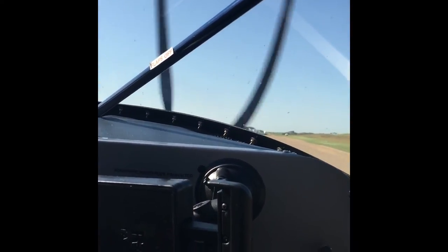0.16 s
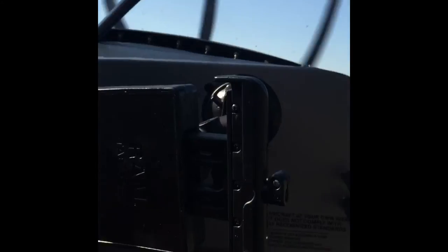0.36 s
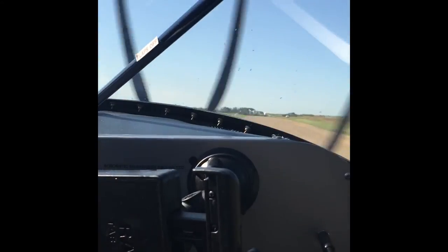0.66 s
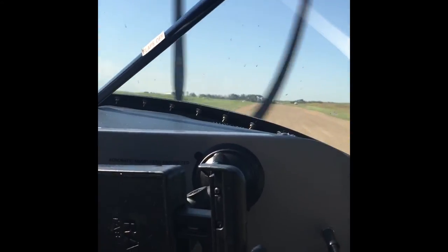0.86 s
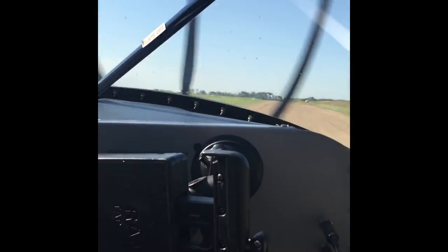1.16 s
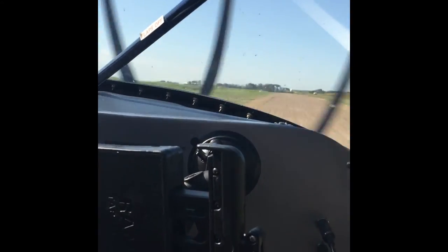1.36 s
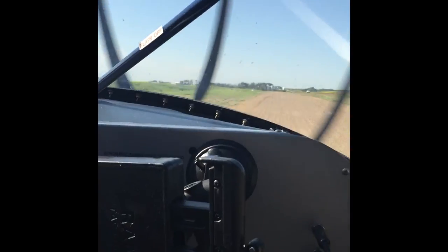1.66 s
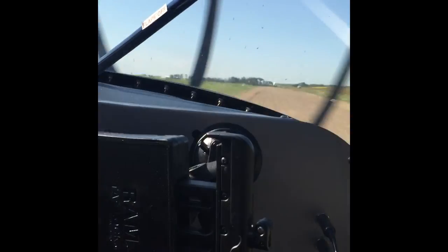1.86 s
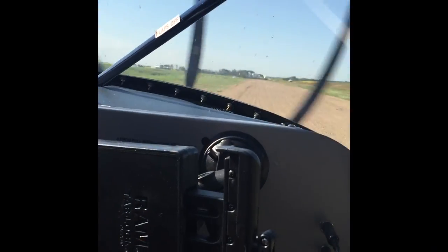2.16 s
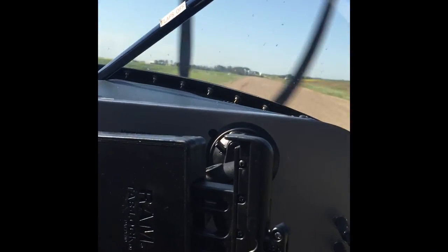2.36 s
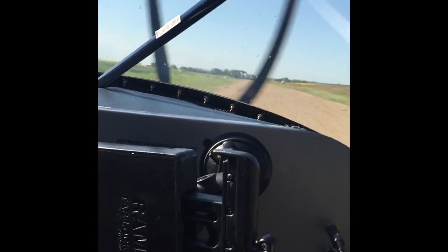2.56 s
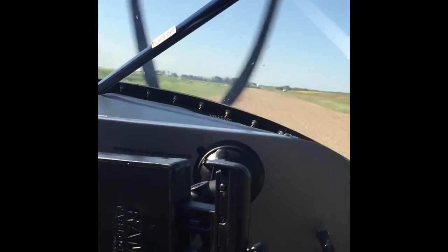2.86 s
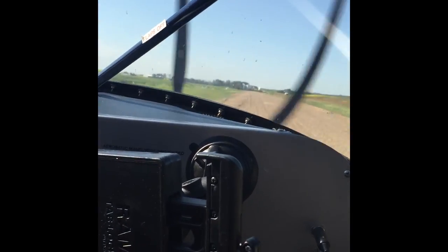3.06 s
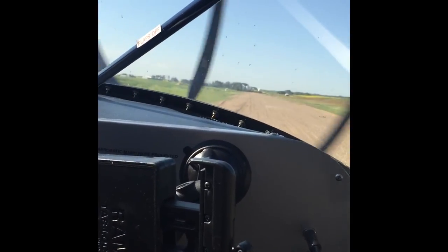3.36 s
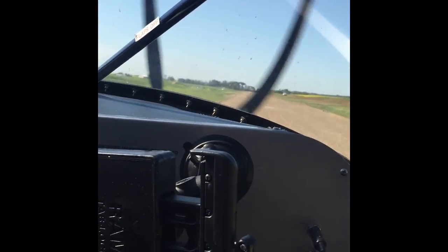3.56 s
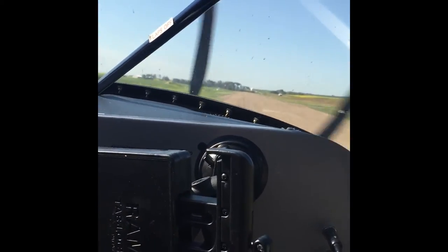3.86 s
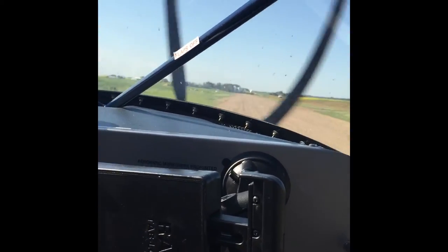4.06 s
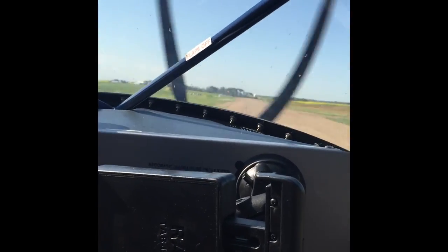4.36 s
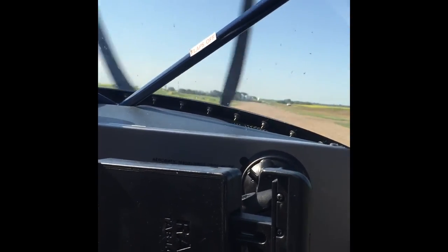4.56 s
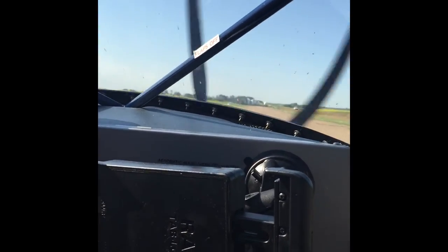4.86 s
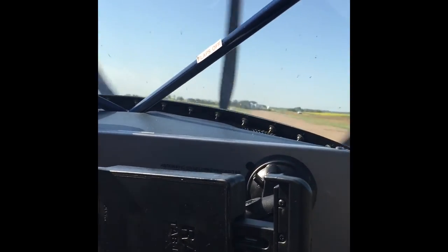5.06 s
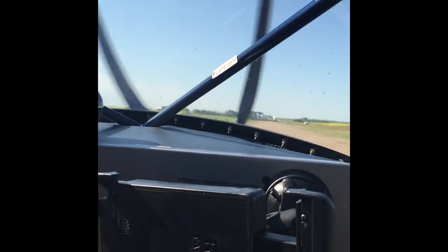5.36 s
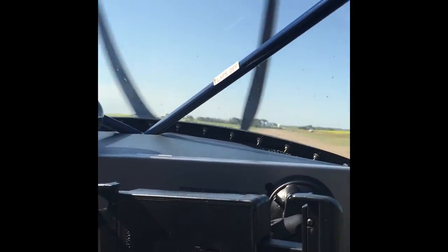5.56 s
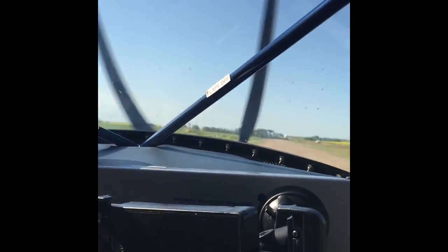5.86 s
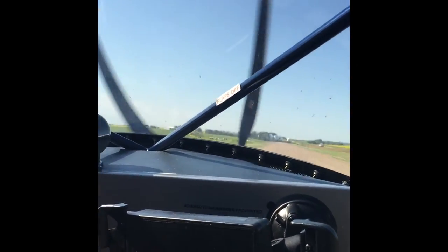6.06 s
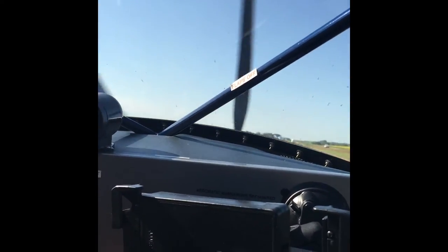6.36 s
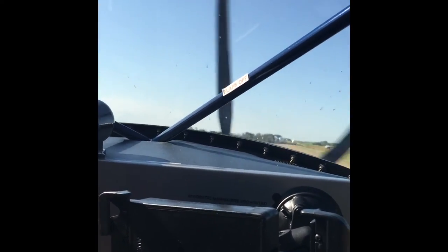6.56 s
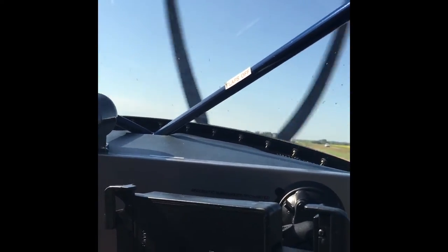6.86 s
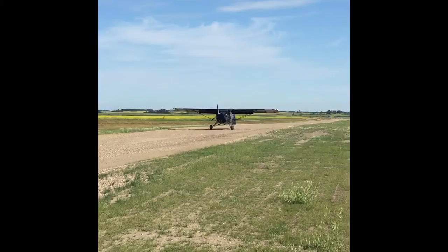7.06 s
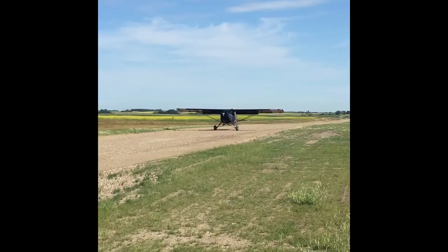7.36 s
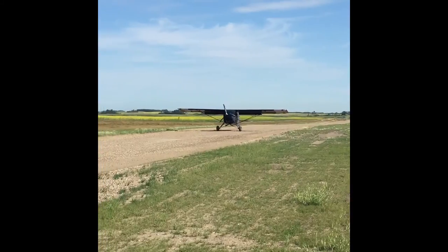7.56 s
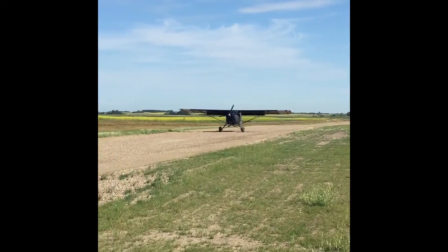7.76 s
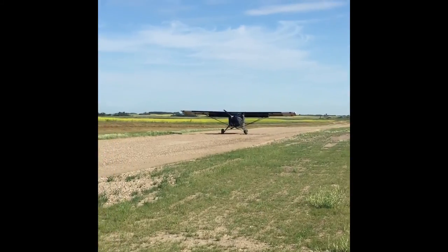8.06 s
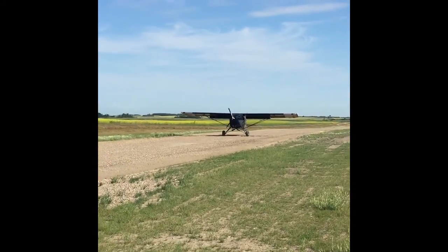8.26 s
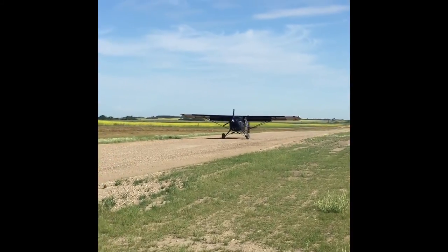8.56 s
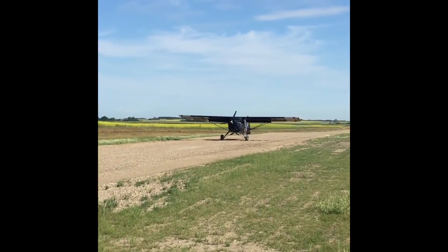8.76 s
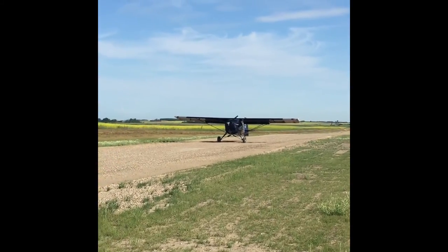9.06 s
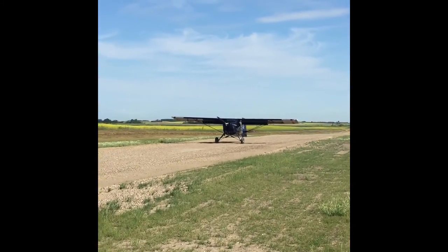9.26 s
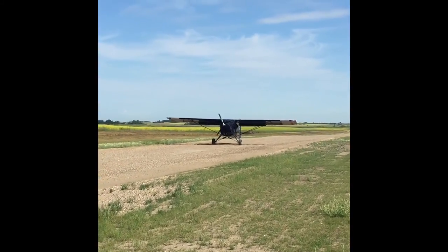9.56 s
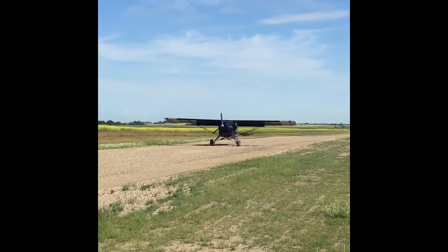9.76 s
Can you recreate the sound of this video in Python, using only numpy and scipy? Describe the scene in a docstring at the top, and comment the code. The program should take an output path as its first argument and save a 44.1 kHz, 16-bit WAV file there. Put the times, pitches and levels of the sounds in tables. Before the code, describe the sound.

A light aircraft's engine, heard from the seat, is throttled back and slides down to a low idle over wheel rumble, rushing air and small cabin rattles. Then the microphone is suddenly outdoors in an open field. The plane putters toward it from a distance, its propeller swish and thin gear whine growing. Soft wind puffs and a dull finger knock hit the microphone.

```python
"""Light aircraft taxiing on a dirt strip

In the cabin a four-cylinder engine is throttled back to idle: its orders slide through the cabin's
resonances, over rumbling wheels, propeller wash and ticking fittings. Then the scene jumps outside:
the plane idles closer, blades swishing and gears whining, with a breeze and one bump on the microphone."""
import sys
import numpy as np
from scipy import signal
from scipy.fft import rfft, irfft, next_fast_len
from scipy.io import wavfile

SR = 44100
rng = np.random.default_rng(int(sys.argv[2]) if len(sys.argv) > 2 else 0)


def unload_audio(sound):
    """Save the sound as a 16-bit wav file, at the path given as the first command line argument."""
    columns = np.transpose(np.atleast_2d(sound))
    # keep every value between -1 and 1, then stretch to whole-number steps
    steps = np.round(np.clip(columns, -1, 1) * 32767)
    wavfile.write(sys.argv[1], SR, steps.astype(np.int16))


N = 436590
TIME = np.arange(N) / SR
OUTSIDE_S, ARRIVED_S = 7.112, 9  # start and end of the approach
REDUCTION, BLADES = 2.43, 3  # crank turns per propeller turn, blade count

# Narrow whining bands and dips in the engine's noise. Each row: centre in Hz, half-width in Hz, lift in dB.
WHINE_BANDS = [(770, 35, 7), (1360, 44, 5), (1850, 60, 6), (2720, 100, 4), (3420, 70, 3), (4450, 110, -4.5),
               (4740, 45, 9.5), (5000, 80, -3.5), (6080, 60, 7), (6770, 60, 8)]


def amp(db):
    """Decibels to gain."""
    return 10 ** (np.asarray(db) / 20)


def unit(x):
    """Scale to rms 1."""
    return x / np.sqrt(np.mean(x ** 2) + 1e-20)


def curve(rows):
    """Rows of (time in s, value), interpolated per sample."""
    return np.interp(TIME, *np.transpose(rows))


def humps(rows):
    return sum(height * np.exp(-(2 * (TIME - s) / length_s) ** 2) for s, length_s, height in rows)


def level_at(spectrum, hz):
    """Rows of (Hz, dB), interpolated on a log-frequency axis."""
    points_hz, db = np.transpose(spectrum)
    return np.interp(np.log(hz + 1), np.log(points_hz + 1), db)


def noise(spectrum, bands=(), skirt_db_per_octave=30):
    """Noise of rms 1, shaped by a spectrum and narrow bands, rolled off past the spectrum's ends."""
    size = next_fast_len(N, True)
    hz = np.fft.rfftfreq(size, 1 / SR) + 1e-9
    octaves_out = abs(np.log2(hz / np.clip(hz, spectrum[0][0], spectrum[-1][0])))
    db = level_at(spectrum, hz) - skirt_db_per_octave * octaves_out
    db += sum(lift_db / (1 + ((hz - band_hz) / width_hz) ** 2) for band_hz, width_hz, lift_db in bands)
    return unit(irfft(rfft(rng.standard_normal(size)) * amp(db), size)[:N])


def drift(rate_hz):
    """Random wander of rms 1, mostly below rate_hz."""
    size = 4096
    hz = np.fft.rfftfreq(size, N / SR / size)
    slow = unit(irfft(rfft(rng.standard_normal(size)) / (1 + (hz / rate_hz) ** 2)))
    return np.interp(TIME, np.linspace(0, N / SR, size), slow)


def partial(turns, order=1):
    """Sinusoid at a multiple of a rotation; rms 1, random phase."""
    return np.sqrt(2) * np.cos(2 * np.pi * (order * turns + rng.random()))


def add(mix, start_s, sound):
    """Mix a sound in at start_s."""
    part = mix[round(start_s * SR):][:len(sound)]
    part += sound[:len(part)]


def throttle(ease_at_s=0.79, closing_s=0.56):
    """Throttle position: 1 open, 0 idle."""
    return np.clip(1 - (TIME - ease_at_s) / closing_s, 0, 1)


def approach(lost_db, steepness):
    """Level in dB as the plane nears: -lost_db when far, 0 on arrival."""
    far = np.clip((ARRIVED_S - TIME) / (ARRIVED_S - OUTSIDE_S), 0, 1)
    return -lost_db * far ** steepness


def swell(centre_s=8.68, length_s=0.44, edge_s=0.17, height_db=8):
    """Brief rise, hold and fall of the exhaust note, in dB."""
    return height_db * np.clip((length_s / 2 - abs(TIME - centre_s)) / edge_s + 0.5, 0, 1)


def propeller_angle(turns, top_s=8.169):
    """Propeller angle in radians, zero at the top of its stroke."""
    return 2 * np.pi * (turns - np.interp(top_s, TIME, turns)) / REDUCTION


def open_air(field_db=-54, breeze_db=-45, gust_db=3.5):
    """Steady outdoor background; a lumpy breeze and puffs of wind strike the microphone."""
    # Spectra. Each row: frequency in Hz, relative density in dB.
    field_spectrum = [(60, 0), (170, 13), (350, -3), (410, 9.5), (470, -3), (1300, -16), (1900, -40),
                      (3000, -20), (6000, -25), (15000, -34)]
    breeze_spectrum = [(15, -20), (32, -4), (48, 6), (75, 1), (120, 0), (250, -31), (600, -48)]
    # Wind puffs. Each row: start in seconds, level in dB, length in seconds.
    puffs = [(7.333, -41, 0.091), (7.567, -38, 0.068), (9.401, -31, 0.07), (9.503, -40, 0.072)]
    wind = noise(breeze_spectrum)
    out = amp(field_db) * noise(field_spectrum)
    out += amp(breeze_db) * unit(wind * amp(gust_db * drift(18)))
    for start_s, db, length_s in puffs:
        puff = wind[round(start_s * SR):][:round(length_s * SR)]
        add(out, start_s, amp(db) * unit(puff) * np.hanning(len(puff)))
    return out


def finger_bump(rub_db=-35):
    """A finger knocks the microphone's housing: a few cycles per knock, with a dull rub of skin."""
    # Knocks. Each row: start in seconds, level in dB, ring in Hz, length in seconds.
    knocks = [(8.152, -29, 430, 0.0071), (8.158, -15.5, 138, 0.027), (8.16, -28, 290, 0.016),
              (8.181, -34, 420, 0.018), (8.189, -24, 110, 0.0246)]
    out = np.zeros(N)
    rub = amp(rub_db) * noise([(100, 11), (480, -4), (750, -13), (1500, -33)])
    for start_s, db, hz, length_s in knocks:
        t = np.arange(0, length_s, 1 / SR)
        knock = amp(db) * np.sin(2 * np.pi * hz * t) + rub[round(start_s * SR):][:len(t)]
        add(out, start_s, knock * np.sin(np.pi * t / length_s))
    return out


def airframe(rumble_db=-25.5, clatter_db=-36, wash_db=-38, build_db_per_s=0.8134):
    """Wheels shake the frame and its panels; propeller wash beats on the windscreen."""
    # Rough ground. Each row: centre in seconds, length in seconds, extra shaking in dB.
    patches = [(.33, 0.51, 5), (1.073, 0.15, 3), (2.629, 0.51, 4), (3.05, 0.41, 3), (3.55, 0.093, 4),
               (4.001, 0.82, 2.5), (4.952, 0.34, 1.5), (5.65, 0.66, 4), (6.677, 1, 3)]
    # Spectra. Each row: frequency in Hz, relative density in dB.
    rumble_spectrum = [(15, -30), (32, -21), (48, -3.5), (68, -2.5), (110, -1), (148, -4), (162, 2),
                       (180, -5), (205, -7), (285, -11.5), (350, -19), (450, -30), (700, -50), (1500, -70)]
    clatter_spectrum = [(250, 4.5), (420, 5.5), (520, 2), (620, 5), (720, 3.5), (820, 1.5), (910, 4),
                        (1200, -6.5), (1700, -14.5), (3500, -23)]
    wash_spectrum = [(500, -12), (1200, 1), (2100, 1), (3000, -4), (4500, -6.5), (4900, -9), (5600, -9),
                     (7200, -12), (8300, -10), (9600, -14.5), (10400, -21), (11200, -18), (15300, -23.5)]
    # Panel resonance. Each row: centre in Hz, half-width in Hz, lift in dB.
    panel_rings = [(1145, 28, 4.5)]
    ground_db = build_db_per_s * TIME + humps(patches)
    rumble = amp(rumble_db + ground_db) * noise(rumble_spectrum)
    clatter = amp(clatter_db + 0.49 * ground_db) * noise(clatter_spectrum, panel_rings)
    gusts_db = 0.3 * drift(70)
    wash = amp(wash_db + 0.25 * ground_db + 2.5 * throttle() + gusts_db) * noise(wash_spectrum)
    shake = amp(0.84 * drift(41))
    return rumble + shake * (clatter + wash)


def fittings(tick_s=0.0012, tail_s=0.009, faint_db=-41, faint_per_s=9):
    """Loose fittings tick and buzz briefly, faint random ticks between; jolts set a panel ringing."""
    # Clear ticks. Each row: start in seconds, level in dB.
    ticks = [(0.3541, -28.5), (0.9313, -32.5), (1.4341, -33), (1.955, -33), (2.5701, -36), (3.1482, -33),
             (4.5306, -36), (5.1442, -37), (5.8132, -36), (6.0492, -33)]
    # Jolts. Each row: start in seconds, level in dB, length in seconds, ring in Hz, bandwidth in Hz.
    jolts = [(0.255, -31.5, 0.09, 750, 45), (0.405, -35, .022, 784, 200), (4.875, -34, 0.12, 760, 160),
             (5.775, -32, 0.025, 720, 60)]
    t = np.arange(SR // 20) / SR
    snap = t / tick_s * np.exp(1 - t / tick_s)
    tail = 0.17 * (1 - np.exp(-t / tick_s)) * np.exp(-t / tail_s)
    strikes = amp(faint_db) * rng.random(N) * (rng.random(N) < faint_per_s / SR)
    for start_s, db in ticks:
        add(strikes, start_s, amp([db]))
    envelope = signal.oaconvolve(strikes, snap + tail)[:N]
    out = envelope * noise([(800, -18), (3000, 6.5), (9000, 1), (15000, -4)])
    for start_s, db, length_s, hz, width_hz in jolts:
        knocks = rng.standard_normal(SR // 2)[:round(length_s * SR)] ** 3
        ring = signal.lfilter(*signal.iirpeak(hz, hz / width_hz, SR), knocks)
        add(out, start_s, amp(db) * unit(ring) * signal.windows.tukey(len(ring), 0.5))
    return out


def rattles():
    """Fittings rattle in uneven bursts, each two octaves wide."""
    # Bursts. Each row: start in seconds, level in dB, length in seconds, band centre in Hz.
    bursts = [(.245, -31.5, .065, 1200), (.405, -33.5, .03, 1150), (1.42, -45, .06, 2800),
              (2.515, -43, .11, 2800), (2.64, -42, .1, 1900), (3.5, -43, .045, 3000),
              (5.925, -36.5, .125, 1600), (6.4, -45, .06, 3000), (6.51, -39.5, .11, 1400)]
    out = np.zeros(N)
    knocks = rng.standard_normal(N) * amp(4 * drift(150))
    for start_s, db, length_s, hz in bursts:
        band = signal.butter(2, [hz / 2, hz * 2], "band", fs=SR, output="sos")
        burst = signal.sosfilt(band, knocks[round(start_s * SR):][:round(length_s * SR)])
        add(out, start_s, amp(db) * unit(burst) * signal.windows.tukey(len(burst)))
    return out


def intake_hiss(whistle_hz=7672.5, wander_hz=186, fuzz_hz=110):
    """Flickering intake hiss with a fuzzy, wandering whistle; rms 1."""
    # Hiss spectrum. Each row: frequency in Hz, relative density in dB.
    spectrum = [(7000, -6), (8300, 4), (9700, -5), (15300, -19)]
    centre_hz = whistle_hz + wander_hz * drift(3)
    whistle = noise([(fuzz_hz, 0)]) * partial(np.cumsum(centre_hz) / SR)
    return unit((noise(spectrum) + 0.5 * whistle) * amp(2 * drift(25)))


def hiss_swells():
    """The high hiss swells briefly in the cabin."""
    # Swells. Each row: centre in seconds, length in seconds, level in dB.
    swells = [(0.05, 0.73, -45.5), (2.8, 0.58, -53)]
    return humps([(s, length_s, amp(db)) for s, length_s, db in swells]) * intake_hiss()


def fading_hum(turns, order=8, level_db=-34.5, fade_s=0.2):
    """One engine order stands out at the start, then fades."""
    return amp(level_db) * np.exp(-(TIME / fade_s) ** 2) * partial(turns, order)


def chugging(turns, chug_db=-53, beat_db=3.5, scuff_width_turns=0.07):
    """A putter beats with the crank and, most from afar, the propeller; bright flutter and scuffs above."""
    # Chug spectrum. Each row: frequency in Hz, relative density in dB.
    spectrum = [(400, 1), (770, 3), (870, -2), (1050, 4.5), (1400, -4.5), (1700, -14), (3000, -19)]
    # Spells of scuffing, once per propeller turn. Each row: centre and length in seconds, level in dB.
    scuff_spells = [(8.26, .3, -55), (9.22, .4, -62)]
    # Blade flutter. Each row: time in seconds, level in dB.
    flutter_levels = [(7.55, -82), (7.87, -69), (8.3, -69), (8.8, -74), (9.45, -66), (9.9, -78)]
    angle = propeller_angle(turns)
    stroke = np.exp((np.cos(angle) - 1) / (2 * (np.pi * scuff_width_turns) ** 2))
    scuff = stroke * humps([(s, length_s, amp(db)) for s, length_s, db in scuff_spells])
    flutter = amp(curve(flutter_levels) + 2 * (np.cos(BLADES * angle) + np.cos(angle) + drift(60)))
    propeller_share = np.interp(TIME, [OUTSIDE_S, ARRIVED_S], [1, 0.4])
    pulse_db = beat_db * (propeller_share * np.cos(angle) + np.cos(2 * np.pi * turns)) + drift(20)
    chug = amp(chug_db + approach(4.5, 1.5) + pulse_db) * noise(spectrum, WHINE_BANDS)
    return chug + (scuff + flutter) * noise([(6000, -6), (12000, -4), (15300, -2)])


def blade_air(turns, swish_db=-48.5, rasp_db=-53, sizzle_db=-57.5):
    """Swish, tip rasp and sizzle, coloured by the gear whine, throbbing with blades and crank."""
    # Spectra. Each row: frequency in Hz, relative density in dB.
    swish_spectrum = [(300, -2), (600, -12.5), (1000, 0), (1550, -1), (2050, 0.5), (2400, -3.5), (2750, -2),
                      (3100, -12), (4400, -9)]
    rasp_spectrum = [(2800, -3.5), (3400, 0.5), (3800, -2), (4500, -9)]
    sizzle_spectrum = [(4000, -26), (5000, -3), (5600, 1.5), (6500, -2.5), (7200, -4), (7900, -10),
                       (8750, -3.5), (9400, -9), (10000, -12), (10700, -18), (13000, -14), (15300, -25)]
    # Flares of the rasp. Each row: centre in seconds, length in seconds, lift in dB.
    flares = [(9.34, .12, 5), (9.65, .1, 5), (9.87, .1, 4)]
    swish = amp(swish_db + approach(32, 2.8) + 0.41 * swell()) * noise(swish_spectrum, WHINE_BANDS)
    rasp = amp(rasp_db + approach(44, 2) + humps(flares)) * noise(rasp_spectrum, WHINE_BANDS)
    sizzle = amp(sizzle_db + approach(54, 3.8)) * noise(sizzle_spectrum, WHINE_BANDS)
    throb = 1 + 0.07 * partial(turns / REDUCTION, BLADES) + 0.09 * np.cos(2 * np.pi * turns)
    return (swish + rasp + sizzle) * throb * amp(0.7 * drift(25))


def gearbox(turns, whine_db=-55, idle_hz=32.15, wobble=0.4, flutter=0.35):
    """Gear teeth bear harder with each propeller turn and each blade; higher tones carry less far."""
    # Gear tones. Each row: frequency in Hz with the crank at idle_hz, relative level in dB.
    tones = [(1351, 1), (1863, -8)]
    angle = propeller_angle(turns)
    out = np.zeros(N)
    for hz, db in tones:
        load = 1 + wobble * (np.cos(angle) + np.cos(BLADES * angle)) + flutter * drift(25)
        pitch_factor = np.sqrt(hz / tones[0][0])
        level_db = whine_db + db + approach(20 * pitch_factor, 2)
        play_cycles = 0.09 * pitch_factor * drift(14)
        out += amp(level_db) * load * partial(turns * hz / idle_hz + play_cycles)
    return out


def exhaust(turns, note_db=-41, chuff_db=-40, rough=0.21):
    """Uneven idle note with a dull chuff of gas around it."""
    # Idle note. Each row: multiple of crank speed, relative level in dB.
    orders = [(2, -1), (2.5, -9), (4, -9.5), (5, -11), (6, -7), (7, -16.5), (7.5, -12), (8, -8), (9, -11.5)]
    # Chuff spectrum. Each row: frequency in Hz, relative density in dB.
    spectrum = [(25, -19), (70, 2), (120, 3.5), (180, 3), (280, 0.5), (335, -18.5), (600, -18), (1200, -56)]
    distance_db = approach(lost_db=12, steepness=1.75)
    note = sum(amp(db) * partial(turns, order) * (1 + rough * drift(3.5)) for order, db in orders)
    chuff = amp(chuff_db + 0.42 * distance_db) * noise(spectrum)
    return amp(note_db + distance_db + swell()) * note + chuff


def cabin_engine(hz, turns, overtones_db=-25, blades_db=-26, intake_db=-50, rough_idle=0.2, rough_open=0.12):
    """Two firings a turn give the main note; weaker orders swell as they cross the cabin's resonances."""
    # Firing note in the cabin. Each row: frequency in Hz, level in dB.
    firing_levels = [(63, -16), (72, -14.5), (85, -13.5), (91, -17.5), (97, -22), (104, -16), (109, -17.5)]
    # Weaker orders. Each row: multiple of crank speed, relative dB at idle, relative dB under power.
    orders = [(1.01, -12, -8), (2.488, -4, -5), (3.006, -3, -9), (4.008, 3, 8), (4.48, -4.5, -6.5),
              (4.992, 5.5, 4.5), (5.997, -5, 4.5), (7, -2, 3), (8.045, -0.5, -1), (9.024, -4, -3),
              (10.96, -4.5, -1), (11.94, -12, -8), (17, -14, -2), (20.93, -17, -4.5)]
    # Cabin response. Each row: frequency in Hz, gain in dB.
    response = [(35, -15), (55, -1), (105, -11), (128, -8), (139, 0.5), (170, -14), (212, -11), (240, -2),
                (255, -2.5), (273, 3), (298, -2.5), (314, -12), (328, -10), (342, -20), (380, -21.5),
                (490, -19.5), (600, -15), (930, -18), (1200, -21.5)]
    out = amp(level_at(firing_levels, 2 * hz)) * partial(turns, 2) * (1 + 0.091 * drift(12))
    load = (hz / hz.max()) ** 5
    rough = rough_idle + (rough_open - rough_idle) * load  # combustions vary most at idle
    for order, idle_db, open_db in orders:
        db = overtones_db + idle_db + (open_db - idle_db) * load + level_at(response, order * hz)
        db += 0.2 * max(order - 5, 0) * drift(7)  # high orders fade in and out
        jitter_turns = 0.025 * rough * drift(18)
        out += amp(db) * (1 + rough * drift(12)) * partial(turns + jitter_turns, order)
    blades = amp(blades_db) * load * partial(turns / REDUCTION, BLADES) * (1 + 0.46 * drift(5.7))
    return out + blades + amp(intake_db) * throttle() * intake_hiss()


def scene(crossfade_s=0.022):
    """First from the seat, then from the edge of the strip."""
    # Crank speeds. Each row: time in seconds, speed in turns per second.
    cabin_speed = [(0.0, 55.0), (0.06, 54.7), (1.3, 54.4), (1.52, 53.2), (2.23, 44.7), (2.79, 43.0),
                   (3.12, 42.4), (3.32, 41.6), (3.46, 40.5), (3.89, 35.5), (4.01, 35.3), (4.65, 34.7),
                   (5.42, 32.4), (6.19, 32.3), (7.1, 31.5)]
    idle_speed = [(7.5, 31.2), (7.9, 32.15)]
    crank_hz = curve(cabin_speed)
    turns = np.cumsum(crank_hz * (1 + 0.0016 * drift(9.5))) / SR
    inside = cabin_engine(crank_hz, turns) + airframe() + fittings() + rattles()
    inside += fading_hum(turns) + hiss_swells()
    idle_turns = np.cumsum(curve(idle_speed) * (1 + 0.001245 * drift(2.27))) / SR
    outside = exhaust(idle_turns) + gearbox(idle_turns) + blade_air(idle_turns) + chugging(idle_turns)
    outside += open_air() + finger_bump()
    jump = np.clip((TIME - OUTSIDE_S) / crossfade_s + 0.5, 0, 1)
    return ((1 - jump) * inside + jump * outside)[None]


def record(dry, cutoff_hz=15300):
    """Steep low-pass."""
    lowpass = signal.firwin(511, cutoff_hz, window=("kaiser", 9), fs=SR)
    return signal.oaconvolve(dry, lowpass[None], "same")


dry = scene()
out = record(dry)
unload_audio(out)
```